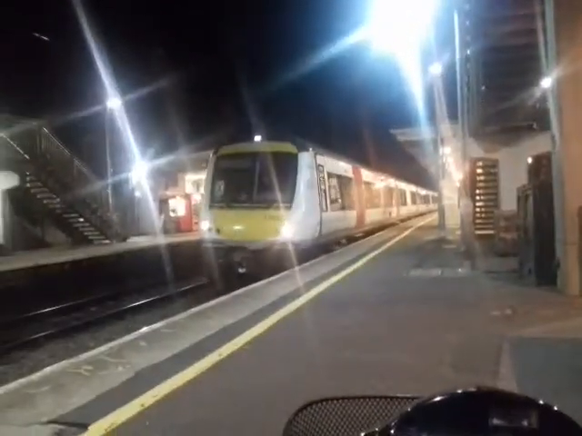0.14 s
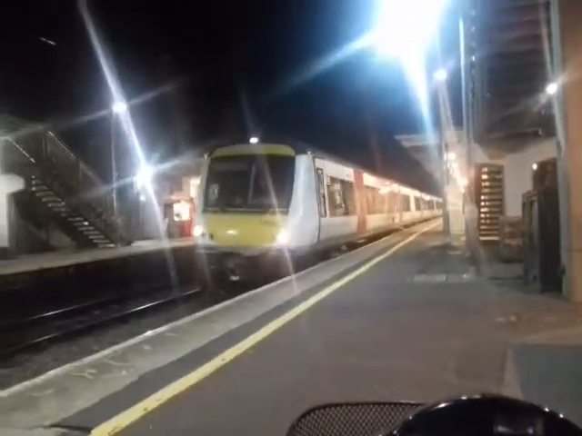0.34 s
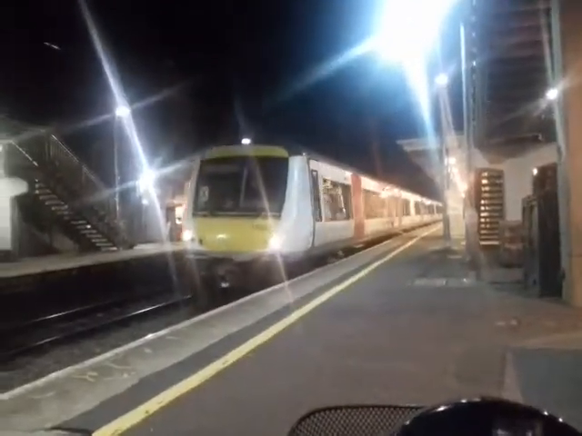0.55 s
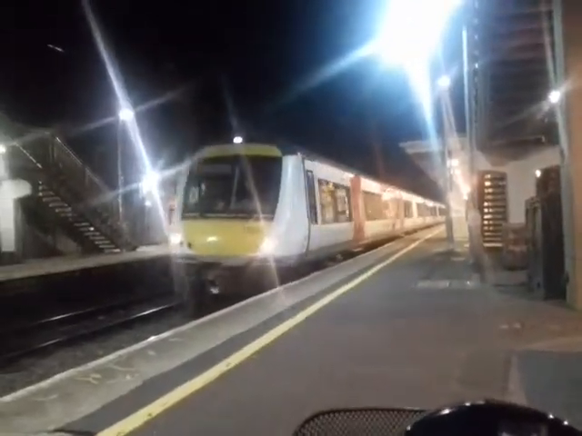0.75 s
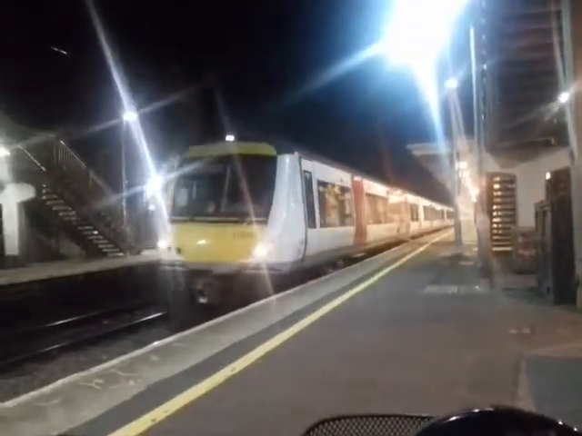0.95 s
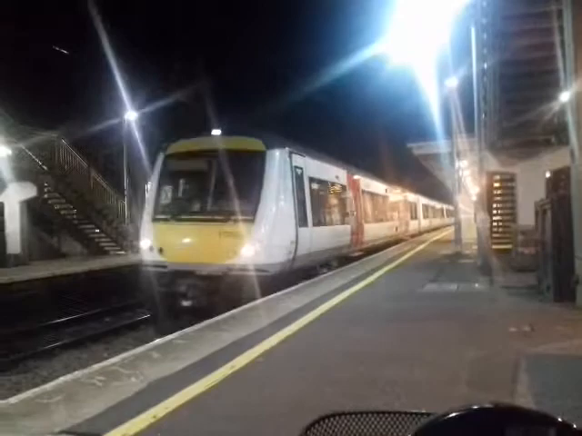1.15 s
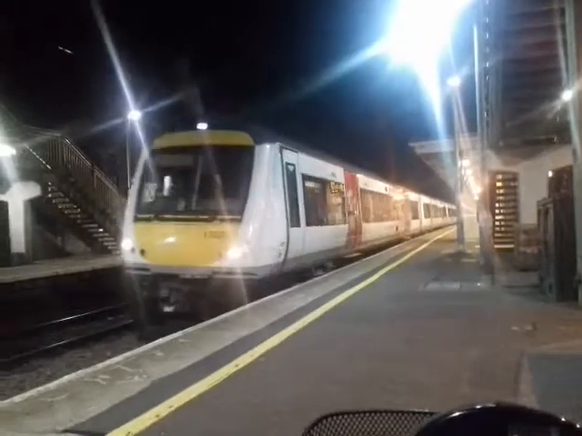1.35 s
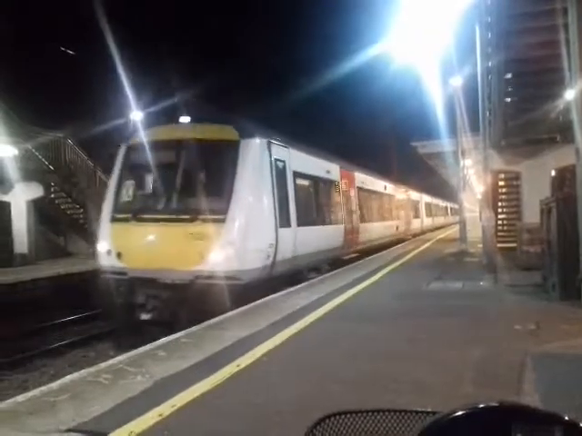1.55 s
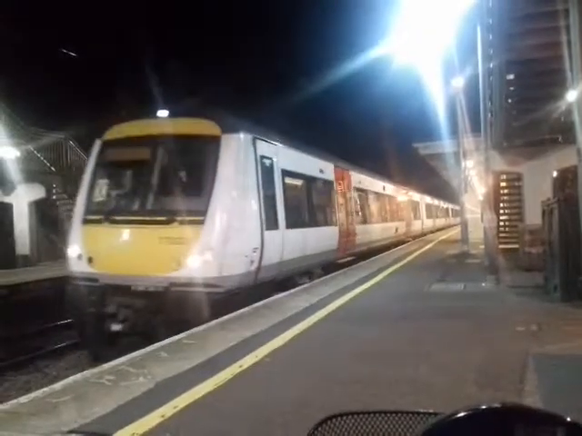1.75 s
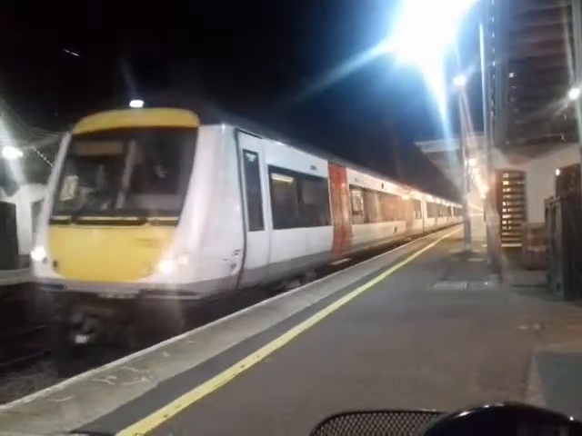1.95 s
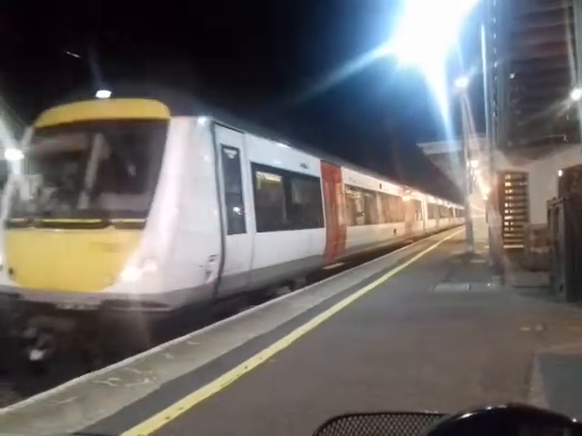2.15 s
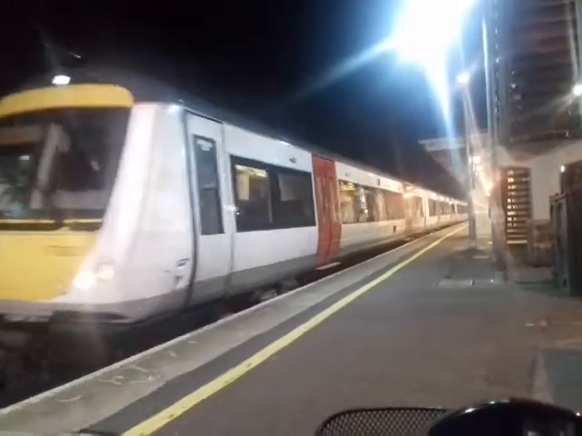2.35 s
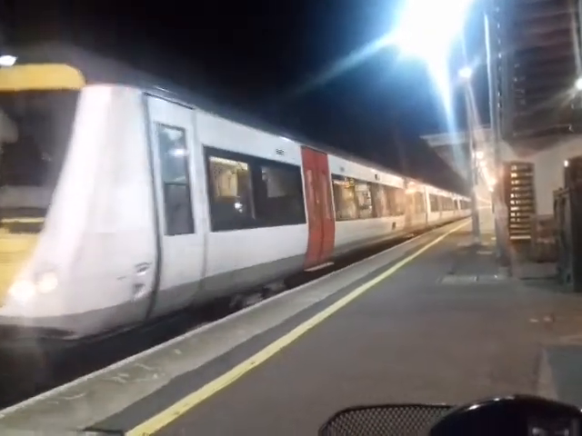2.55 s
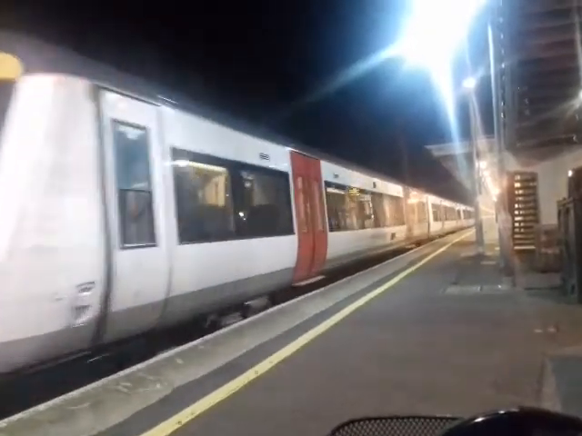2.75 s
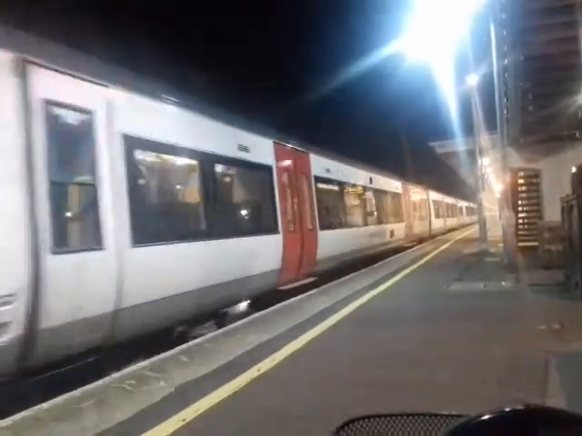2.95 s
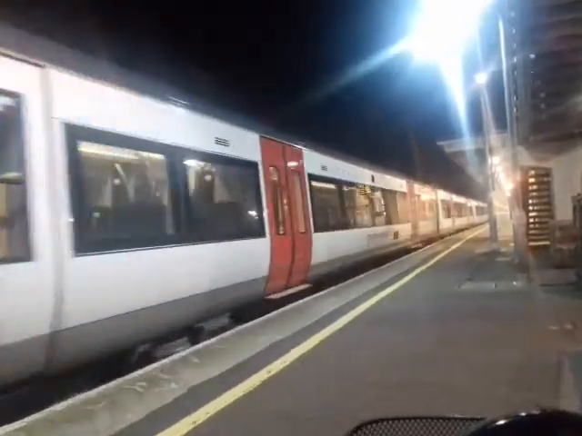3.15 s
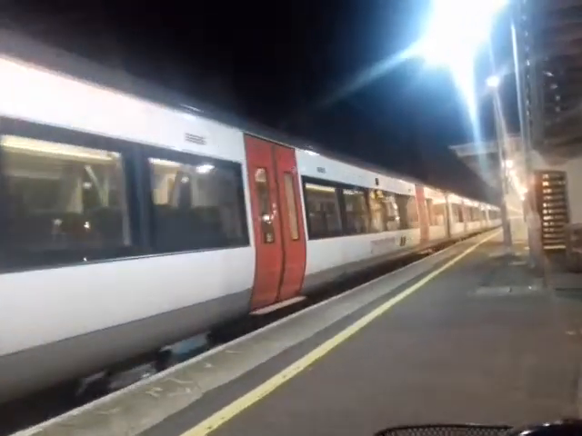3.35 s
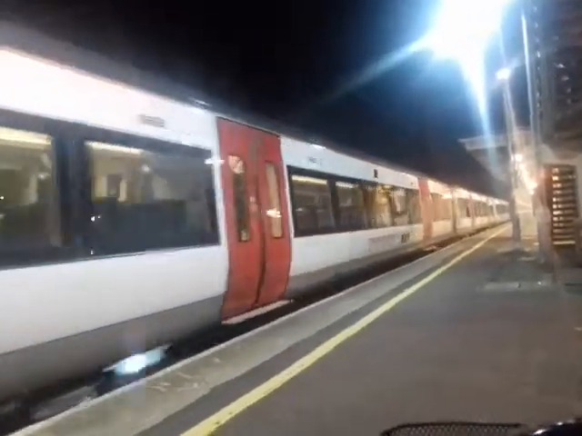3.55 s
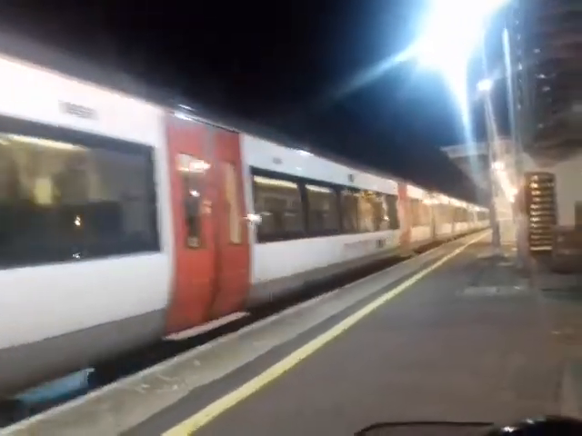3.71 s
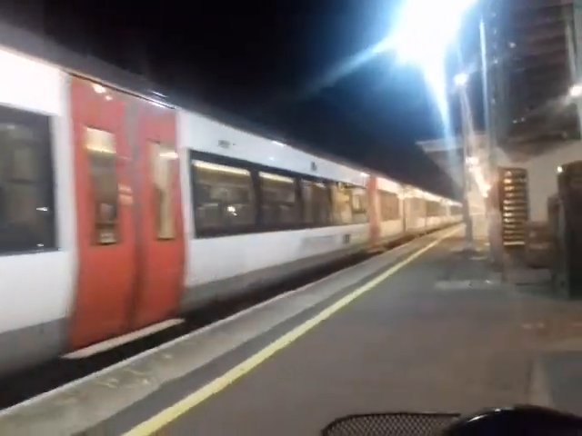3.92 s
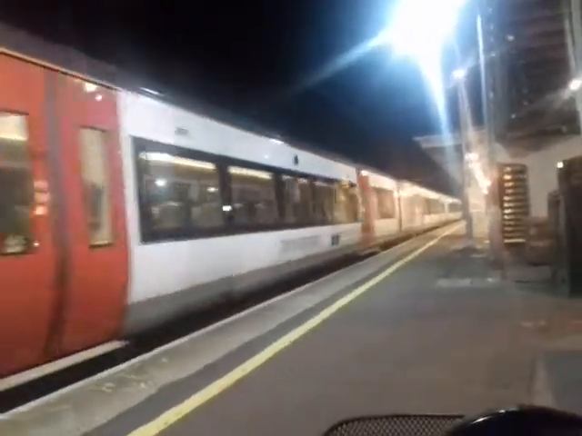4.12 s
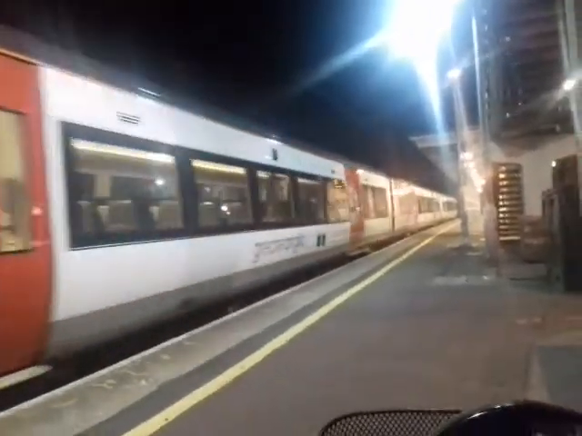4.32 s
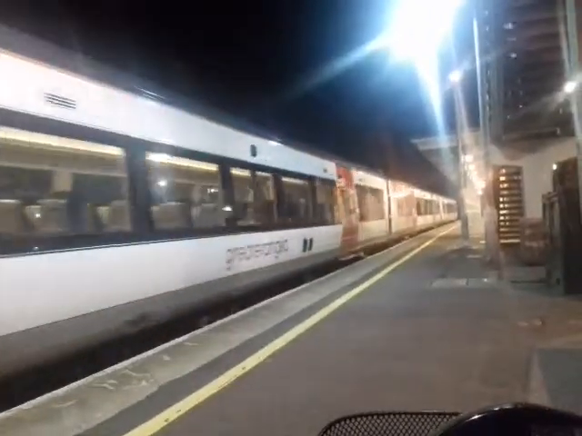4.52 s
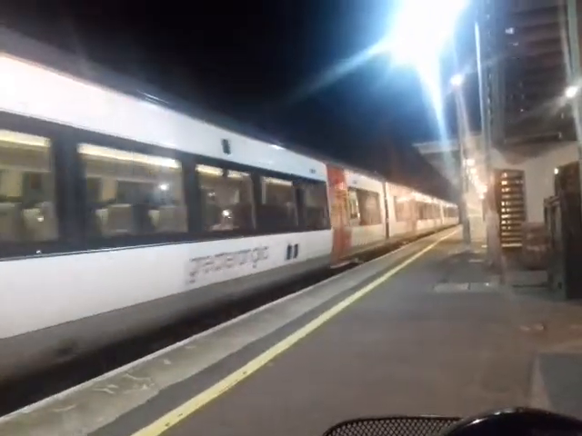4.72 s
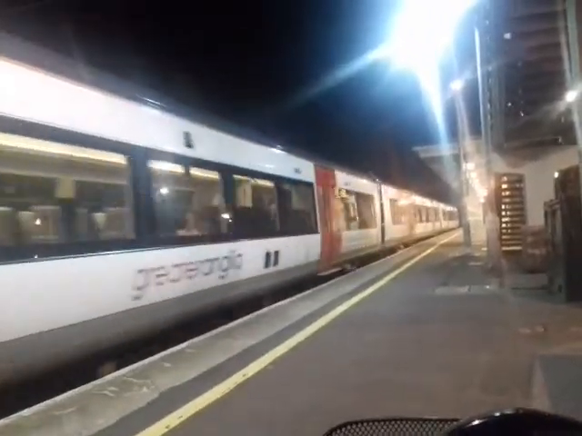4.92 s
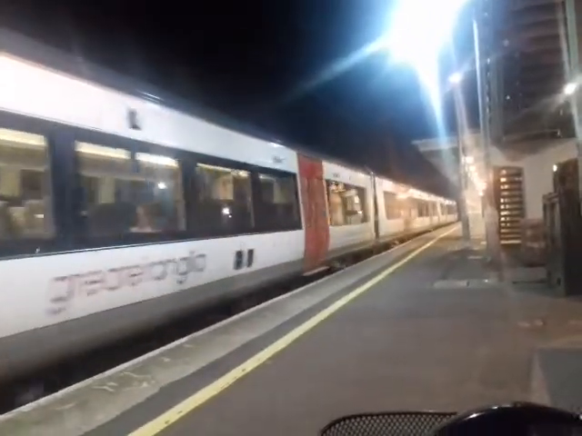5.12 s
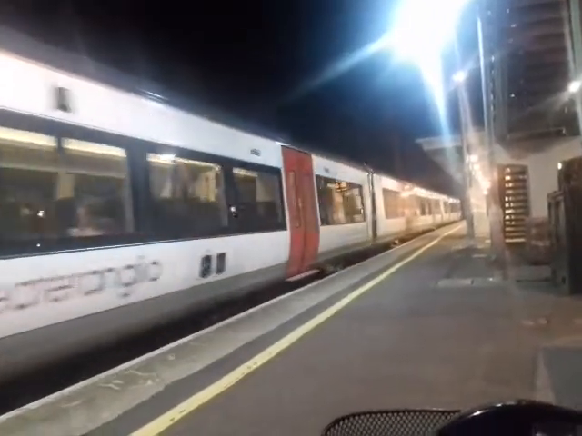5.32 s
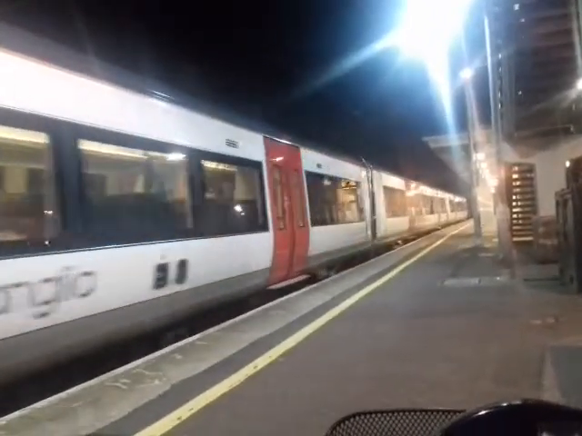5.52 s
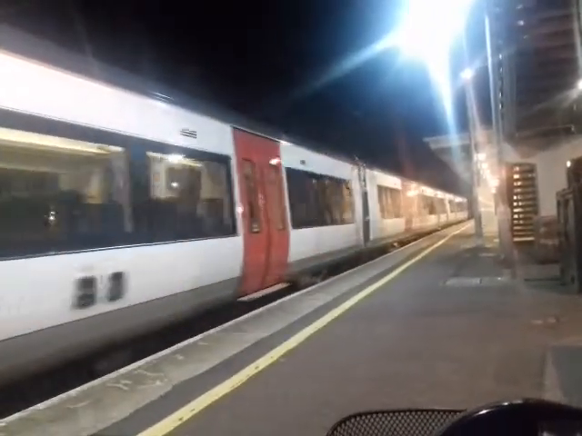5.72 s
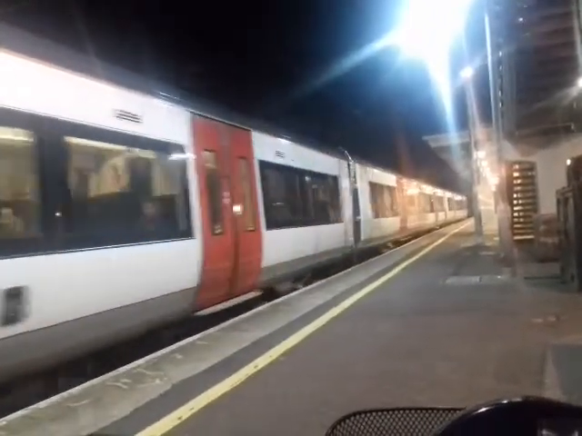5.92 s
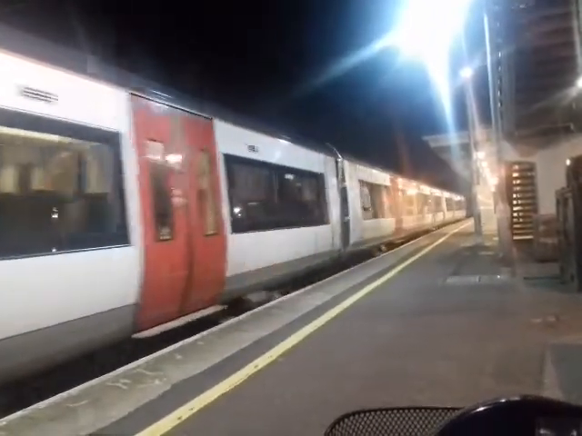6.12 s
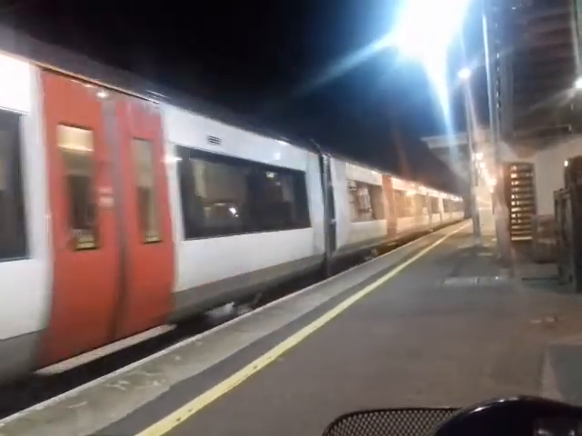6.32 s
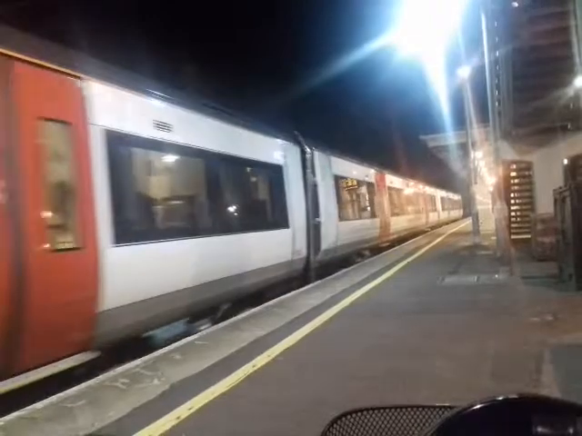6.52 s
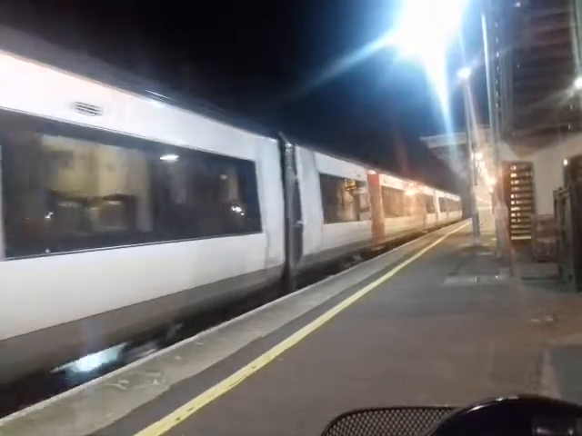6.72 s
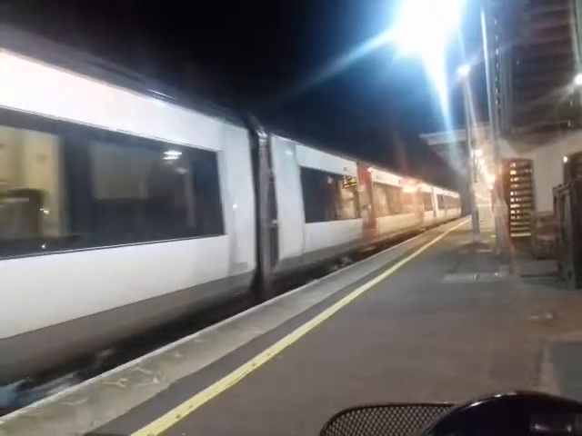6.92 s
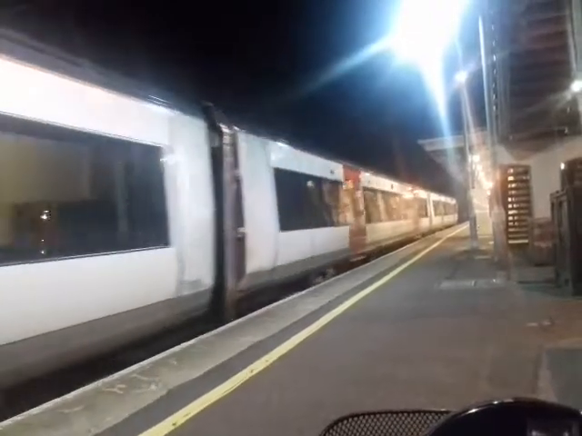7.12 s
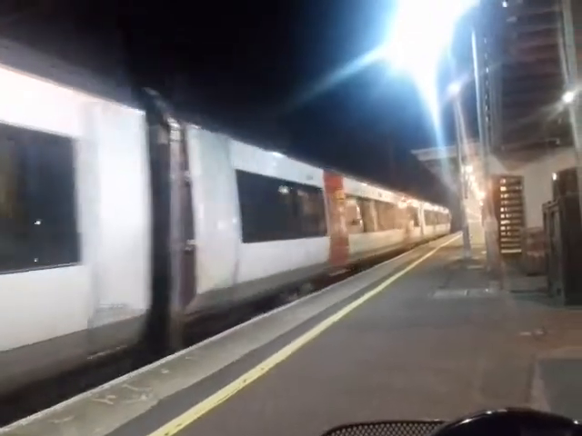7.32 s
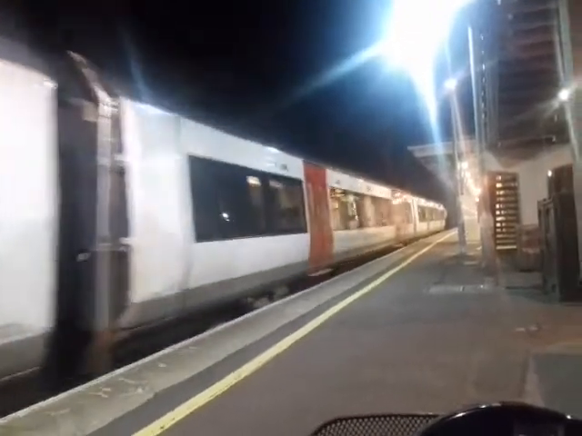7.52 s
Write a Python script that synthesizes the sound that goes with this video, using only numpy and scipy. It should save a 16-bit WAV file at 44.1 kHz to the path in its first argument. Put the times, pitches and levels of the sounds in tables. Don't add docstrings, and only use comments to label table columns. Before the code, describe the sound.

On an open platform at night, a diesel train rolls past a small nearby microphone. Two slightly mismatched underfloor engines hold a low, steady drone that throbs and wavers over rough exhaust roar. Tiny grit ticks come near the first second. The coaches then bring growing wheel roar and airy hiss, a thin falling whine, and finally a rubbing wheel flange, still loud when the sound stops.

```python
import sys
import numpy as np
from scipy import signal
from scipy.fft import rfft, irfft, next_fast_len
from scipy.io import wavfile
from scipy.ndimage import uniform_filter1d, map_coordinates

SR = 44100
rng = np.random.default_rng(int(sys.argv[2]) if len(sys.argv) > 2 else 0)


def field_ratio(decibels):
    return 10 ** (np.asarray(decibels, dtype=float) / 20)


def waveform_to_disk(signal):
    frames = np.transpose(np.atleast_2d(signal))
    scaled = np.clip(frames, -1, 1) * 32767
    samples = np.round(scaled).astype(np.int16)
    wavfile.write(sys.argv[1], SR, samples)


N = 337806

HIGH_GAIN_DB_PER_S = 1.22


def unit(x):
    return x / np.sqrt(np.mean(np.abs(x) ** 2) + 1e-20)


def curves(rows):
    s, *columns = np.transpose(rows)
    return [np.interp(np.arange(N) / SR, s, column) for column in columns]


def wobble(rate_hz):
    knots = rng.standard_normal(int(N * rate_hz / SR) + 4)
    return map_coordinates(knots, [np.arange(N) * rate_hz / SR], order=1)


def turns(hz):
    return 2 * np.pi * np.cumsum(hz) / SR


def since_mid():
    return (np.arange(N) - N / 2) / SR


def heard(level, paths):
    mid_db, gain_db_per_s = level
    t = np.arange(0, N, 64) / SR
    bells = sum(db * np.exp(-0.5 * ((t - s) / half_s) ** 2) for s, db, half_s in paths)
    return mid_db + gain_db_per_s * since_mid() + np.interp(np.arange(N) / SR, t, bells)


def patched(x, size, bins, frames, depth_db):
    z = signal.stft(x, nperseg=size)[2]
    field = rng.standard_normal(z.shape)
    field = uniform_filter1d(field, size=bins, axis=0)
    field = uniform_filter1d(field, size=frames, axis=1)
    return signal.istft(z * field_ratio(depth_db * unit(field)), nperseg=size)[1]


def rush(spectrum, patchy_db, ring_db):
    x = patched(rng.standard_normal(N + 512), 512, 5, 12, patchy_db)
    x = patched(x, 4096, 2, 10, ring_db)
    m = next_fast_len(N + 16384)
    f, db = np.transpose(spectrum)
    log_hz = np.log(np.fft.rfftfreq(m, 1 / SR) + 1)
    gain = field_ratio(np.interp(log_hz, np.log(f + 1), db, left=-120, right=-120))
    return unit(irfft(rfft(x, m) * gain, m)[:N])


def order(angle, multiple, db, drift, fade_db):
    phase = rng.uniform(0, 2 * np.pi) + 1.5 * wobble(0.8)
    level = np.sqrt(2) * field_ratio(db + fade_db * wobble(2.896))
    return level * np.sin(multiple * angle + phase + drift * wobble(5.5))


def ticks():
    # (time [s], peak level [dB], frequency [Hz])
    tick_rows = [
        (1.0028, -38, 5900),
        (1.0548, -35, 6270),
        (1.175, -45, 5600),
        (5.853, -51, 5550),
        (7.196, -38, 5800),
    ]
    out, t = np.zeros(N + SR), np.arange(400) / SR
    u = t / 0.0003
    for s, db, hz in tick_rows:
        start = round(s * SR)
        out[start:start + len(t)] += field_ratio(db) * u * np.exp(1 - u) * np.sin(2 * np.pi * hz * t)
    return out[:N]


def whines():
    # (time [s], frequency [Hz], level [dB])
    glides = [
        [(2.2, 1436, -57), (2.6, 1433, -43), (3.8, 1416, -43), (4.6, 1397, -41), (5.2, 1379, -51),
         (5.8, 1351, -36.5), (7.3, 1321, -44), (7.66, 1311, -61)],
        [(5.4, 3546, -69), (6.1, 3550, -46), (6.3, 3536, -43), (6.7, 3540, -38), (7, 3515, -41.5),
         (7.25, 3525, -40.5), (7.66, 3500, -40)],
        [(6.4, 801, -50), (6.7, 776, -37.5), (7, 763, -31), (7.2, 761, -61)],
        [(6.7, 8710, -84), (7.15, 8810, -62), (7.4, 8880, -60), (7.66, 9010, -64)],
        [(5.6, 13910, -92), (6.1, 13950, -73.5), (6.6, 13800, -73), (6.85, 13810, -79), (7.15, 13810, -71),
         (7.45, 13810, -86)],
    ]
    smears = [22, 95, 25, 300, 900]
    out = np.zeros(N)
    for rows, smear_hz in zip(glides, smears):
        first, last = rows[0], rows[-1]
        onset, end = (first[0] - 0.05, first[1], -120), (last[0] + 0.05, last[1], -120)
        hz, db = curves([onset] + rows + [end])
        smear = unit(wobble(smear_hz) + 1j * wobble(smear_hz))
        out += np.sqrt(2) * field_ratio(db) * np.real(smear * np.exp(1j * turns(hz)))
    return out


def exhaust_roar():
    # (frequency [Hz], level [dB per Hz])
    rumble = [(16, -49), (42, -36.5), (98, -20.5), (152, -5.5), (205, -6.5), (310, -0.5), (410, -3.5),
              (510, -8), (610, -21.5), (720, -22.5)]
    return field_ratio(HIGH_GAIN_DB_PER_S * since_mid() - 25.5) * rush(rumble, patchy_db=1.0, ring_db=2.0)


def rolling(shaft):
    # (time [s], level [dB])
    nearness = [(0.0, -33), (0.28, -33), (2.54, -33.5), (4.03, -31), (4.27, -31.5), (4.35, -29.5),
                (5.57, -27), (5.59, -26), (5.89, -24.5), (5.95, -28), (6.21, -24), (6.57, -26),
                (6.83, -28.5), (6.98, -26.5), (7.49, -26.5), (7.51, -21.5), (7.53, -25.5), (7.66, -26)]
    # (level at mean nearness [dB], share [dB per dB], own gain [dB/s])
    layers = [(-30, 0.8, 0.75), (-33, 0.97, 0.1), (-35.5, 0.89, -0.04), (-54.5, 0.79, 0.15)]
    # (time [s], level [dB], half width [s])
    layer_swells = [
        [(3.6, 2, 0.44), (7.0, 0, .1), (7.6, -0.5, 0.076)],
        [(.1, -1, .3), (6.5, 1, 0.16), (7.4, -1, 0.43)],
        [(.1, 2, .2), (1.3, 2.5, 0.11), (3.4, 0.5, 0.36), (7.25, 2, .1)],
        [(.1, 0.5, 0.24), (1.3, 1.2, .12), (5.7, 0.5, .1), (7.25, 1, 0.13)],
    ]
    # (frequency [Hz], level [dB per Hz])
    rail = [(480, -25), (600, -2), (780, 0), (1060, 0.3), (1160, -4), (1300, -8), (1500, -30)]
    wheel = [(1050, -13.5), (1300, -1.5), (1420, -1.9), (1700, -2.5), (2020, -3), (2400, -8.5), (2900, -10),
             (3300, -17.5)]
    hiss = [(2600, -20.5), (3050, -7), (3450, -3), (3700, -1), (4000, 0.3), (4350, -4), (4800, -14),
            (5300, -19.5), (5900, -35)]
    air = [(4800, -16), (5500, 0.7), (6500, -7), (7300, -11), (8700, -10), (9700, -13.5), (10200, -16.5),
           (11600, -22), (13500, -23), (14400, -27), (15050, -37.5), (15650, -30.5)]
    flange = [(1900, -19), (2200, -2), (2550, 3), (2900, -7.5), (3200, -20.5)]
    # (time [s], level [dB], half width [s])
    flange_swell = [(6.8, 22, 0.96)]

    near_db = curves(nearness)[0]
    near_db = near_db - near_db.mean()
    rail_db, wheel_db, hiss_db, air_db = (
        share * near_db + heard((db, gain), swells)
        for (db, share, gain), swells in zip(layers, layer_swells))
    knock = unit(1 + 0.1 * np.cos(3 * shaft) + 0.06 * np.cos(shaft))
    shudder = wobble(14)
    low = field_ratio(rail_db - 1.9) * rush(rail, patchy_db=-0.7, ring_db=2.5)
    low += field_ratio(wheel_db - 0.42 + 0.41 * shudder) * rush(wheel, patchy_db=0.0, ring_db=1.35)
    high = field_ratio(hiss_db + 0.4 * shudder) * rush(hiss, patchy_db=0.77, ring_db=1.15)
    high += field_ratio(air_db + 0.4 * shudder) * rush(air, patchy_db=0.8, ring_db=0.5)
    rub = field_ratio(heard((-58, 0), flange_swell)) * rush(flange, patchy_db=1.0, ring_db=2.0)
    return knock * low + high + rub


def pump():
    # (time [s], frequency of the 6th order [Hz])
    speed = [(0, 165.3), (2, 165.1), (3.6, 164.4), (5, 163), (7, 163.6), (7.66, 164.4)]
    drone_orders = (6, 9, 15)
    # (level at mid-run [dB], gain [dB/s])
    drone = [(-25, 1.17), (-23, 3), (-34.5, 0.06)]
    # (time [s], level [dB], half width [s])
    drone_paths = [
        [(0.36, -2.5, 0.06), (0.72, -15, 0.057), (1.28, -8.5, 0.048), (1.96, 3.5, 0.15), (2.68, -5.6, 0.07),
         (3.92, 3.5, 0.4), (4.72, 5, 0.047), (5.28, 5, 0.15), (6.04, -10.5, 0.054), (7.28, 6, 0.06),
         (7.44, -9, 0.41)],
        [(1.04, -14, 0.06), (1.44, -4, 0.048), (1.88, -11, 0.086), (2.8, -18, 0.12), (3.12, -9.5, 0.13),
         (3.76, -10, 0.18), (4.92, -17, 0.065), (5.84, -11, 0.051), (6.64, -8.8, 0.11), (6.76, -9, 0.042),
         (6.92, 3, 0.069), (7.6, -8, 0.2)],
        [(0.24, -17, 0.06), (0.84, -13, 0.11), (3.36, -4, 0.1), (4.68, 6, 0.84), (6.36, 12.5, 0.15),
         (6.6, 6, 0.054), (7.12, 10.5, 0.06)],
    ]
    # (multiple of shaft speed, level [dB])
    weak_orders = [(2.5, -60), (3, -51.5), (5, -47.5), (7, -41.5), (10, -46.5), (12, -41), (13, -37),
                   (18, -49.5)]

    shaft = turns(curves(speed)[0] / 6)
    near_db = HIGH_GAIN_DB_PER_S * since_mid()
    strong = sum(order(shaft, k, heard(level, paths) - 0.4, drift=0.22, fade_db=0.75)
                 for k, level, paths in zip(drone_orders, drone, drone_paths))
    weak = sum(order(shaft, k, db + near_db, drift=0.45, fade_db=0.5) for k, db in weak_orders)
    return strong + weak


def block(shaft):
    casing_orders = (3, 5, 14, 20, 23)
    # (level at mid-run [dB], gain [dB/s])
    casing = [(-47.8, 4), (-41.5, 1.85), (-30.5, 1.14), (-39, 0.34), (-46.5, 3)]
    # (time [s], level [dB], half width [s])
    casing_paths = [
        [(1.64, -12, 0.3), (4.8, -4, 0.15), (5.44, -10, 0.15), (6.36, -13.5, 0.34), (6.64, -10.5, 0.094)],
        [(1.44, -14, 0.21), (2.52, 6, 0.047), (3.2, -4, 0.08), (4.28, 4.2, 0.11), (6.4, -8, 0.2),
         (7.32, -11, 0.06)],
        [(0.48, 9, 0.1), (1.92, -9, 0.06), (2.64, -8.1, 0.06), (3.36, -13, 0.12), (3.8, 10, 0.048),
         (4.36, -8, 0.28), (6.76, -10, 0.08), (7.52, -7, 0.055)],
        [(0.52, 9.5, 0.088), (4.4, 2, 0.096), (6.6, 5.5, 0.06), (7.36, 11, 0.067)],
        [(0.24, 14, 0.31)],
    ]
    # (multiple of shaft speed, relative level [dB])
    comb_orders = [(26, 1), (27, -4.5), (28, -0.5), (29, 1), (31, 1), (32, 2.5), (34, -7), (36, -0.5),
                   (38, -8), (42, -7), (43, -2.5), (45, -3)]
    # (level at mid-run [dB], gain [dB/s])
    comb_level = (-49.5, 1.6)
    # (time [s], level [dB], half width [s])
    comb_paths = [(4.3, 6, 0.87), (5.7, -4.5, .3), (6.599, 1.5, .2)]

    comb_db = heard(comb_level, comb_paths)
    comb = sum(order(shaft, k, db + comb_db + 1.0, drift=0.25, fade_db=1.0) for k, db in comb_orders)
    lines = sum(order(shaft, k, heard(level, paths) - 1.5, drift=0.62, fade_db=1.0)
                for k, level, paths in zip(casing_orders, casing, casing_paths))
    return comb + lines


def engine(shaft):
    boom_orders = (9, 12, 6, 15)
    # (level at mid-run [dB], gain [dB/s])
    boom = [(-23, 1.44), (-20.5, 3.5), (-32, 0.55), (-28.5, 1.1)]
    # (time [s], level [dB], half width [s])
    boom_paths = [
        [(0.64, -5, 0.1), (1.36, -8, 0.052), (1.84, -6, 0.043), (3.04, 2.5, 0.4), (3.08, -9, 0.045),
         (4.08, -9, 0.097), (4.8, -11.4, 0.073), (5.08, -10, 0.037), (5.92, -18.5, 0.14), (6.6, -4.4, 0.23)],
        [(0.04, 7.5, 0.13), (0.48, -5, 0.065), (0.84, -8, 0.05), (1.08, 3.5, 0.072), (1.36, 6, 0.74),
         (1.6, 4.3, 0.065), (1.96, -12, 0.068), (2.72, -5.9, 0.088), (3.12, -13, 0.071), (3.32, -5, 0.06),
         (3.68, -8.5, 0.034), (4.16, -4, 0.037), (4.52, -1.5, 0.31), (5.08, 8, 0.053), (5.16, -14, 0.28),
         (5.64, -8, 0.06), (6.0, 3.3, 0.06), (6.16, -4.5, 0.068), (7.08, -10.5, 0.17), (7.48, -8, 0.08)],
    ]
    thrum_paths = [
        [(0.04, -8, 0.054), (0.8, -9, 0.22), (1.64, -15, 0.11), (2.04, 2, 0.08), (2.72, 6.5, 0.15),
         (3.0, -9, 0.06), (3.2, 6, 0.068), (3.4, -2, 0.06), (3.6, 3, 0.06), (3.84, -10, 0.06), (4.12, 3, 0.06),
         (4.36, -8, 0.06), (5.04, -6.7, 0.14), (5.84, 5.5, 0.11), (6.2, -11.5, 0.08), (6.88, -10, 0.093),
         (7.32, -5.5, 0.086)],
        [(0.24, -9, 0.048), (1.24, -10, 0.08), (3.48, -5.5, 0.28), (4.56, -9, 0.092), (4.96, 9, 0.064),
         (5.28, -5, 0.08), (5.64, 6.5, 0.22), (6.24, 2.5, 0.08), (6.96, -10, 0.06)],
    ]
    # (multiple of shaft speed, mean level [dB])
    weak_orders = [(2, -66), (2.5, -55.5), (4.5, -47.5), (5.5, -53.5), (7.5, -40), (8, -42.5), (8.5, -50),
                   (9.5, -40), (10.5, -41), (11, -35), (11.5, -46.5), (12.5, -45), (13, -51.5),
                   (13.5, -39.5), (14.5, -53), (15.5, -48), (16, -50), (17.5, -48.5), (18, -45),
                   (19, -51.5), (21, -47.5), (22, -48)]

    low_db = 1.3 * since_mid()
    high_db = HIGH_GAIN_DB_PER_S * since_mid()
    strong = sum(order(shaft, k, heard(level, paths) - 0.4, drift=0.25, fade_db=0.8)
                 for k, level, paths in zip(boom_orders, boom, boom_paths + thrum_paths))
    weak = sum(order(shaft, k, db + (low_db if k < 6 else high_db), drift=0.99, fade_db=3.5)
               for k, db in weak_orders)
    return strong + weak


def scene():
    # (time [s], frequency of the 12th order [Hz])
    speed = [(0, 290.8), (1.6, 291.3), (3, 290.6), (4.2, 289.6), (5.2, 288), (7, 287.2), (7.66, 288)]
    shaft = turns(curves(speed)[0] / 12)
    background = ticks() + whines() + exhaust_roar()
    train = rolling(shaft) + pump() + block(shaft) + engine(shaft)
    return (background + train)[None]


def top_cut(x):
    return signal.sosfilt(signal.butter(12, 15620, fs=SR, output="sos"), x)


def record(dry):
    soft = dry / (1 + np.abs(dry / 0.97) ** 5) ** (1 / 5)
    soft *= np.clip(np.arange(N)[::-1] / (0.003 * SR), 0, 1)
    return top_cut(soft)


dry = scene()
out = record(dry)
waveform_to_disk(out)
```